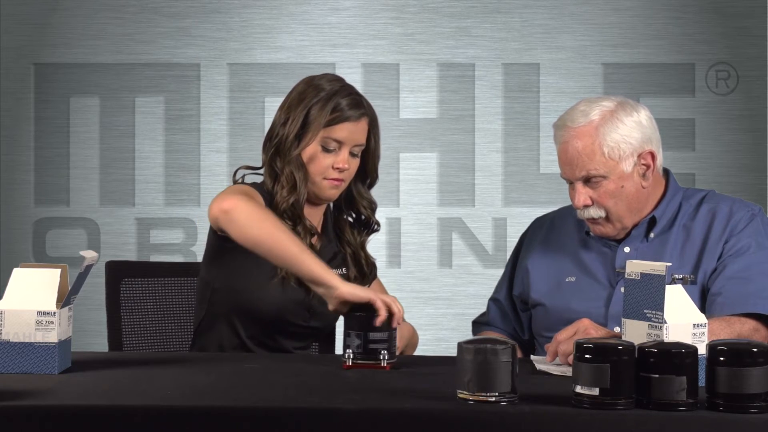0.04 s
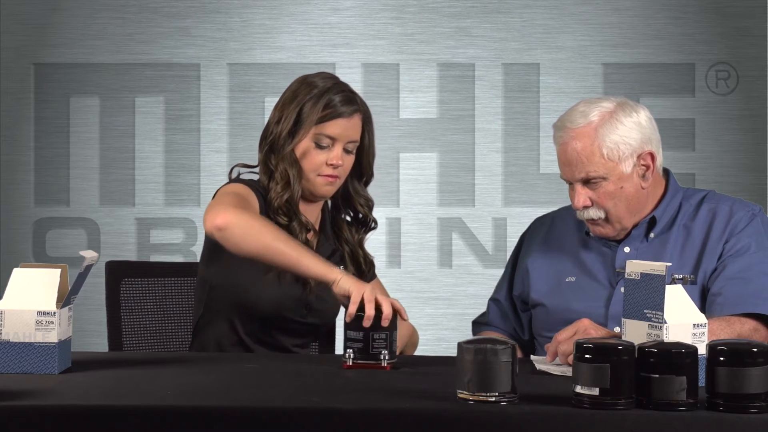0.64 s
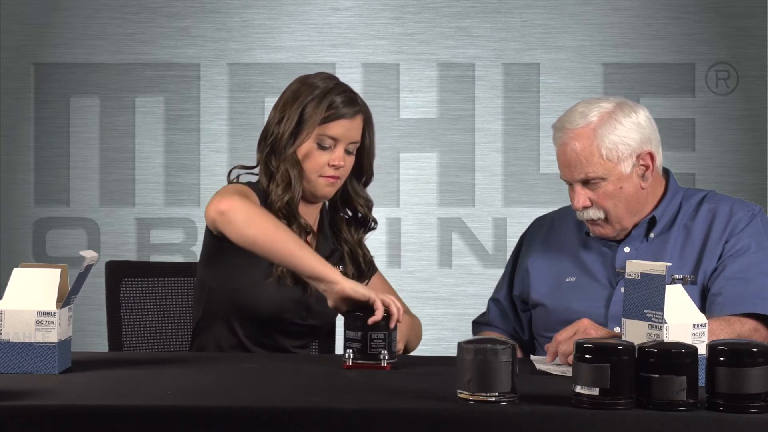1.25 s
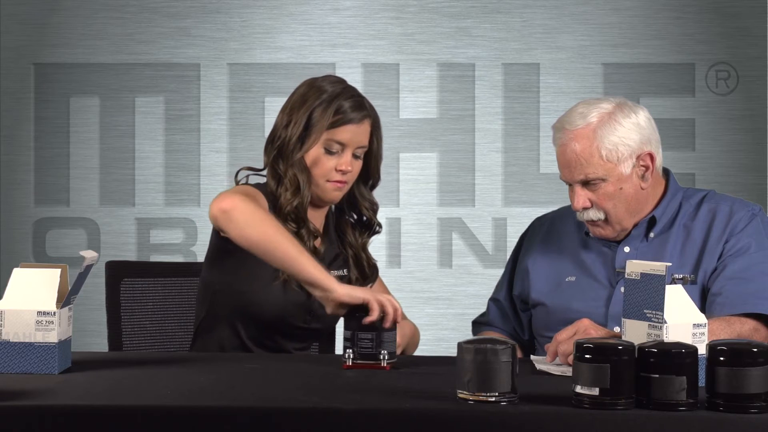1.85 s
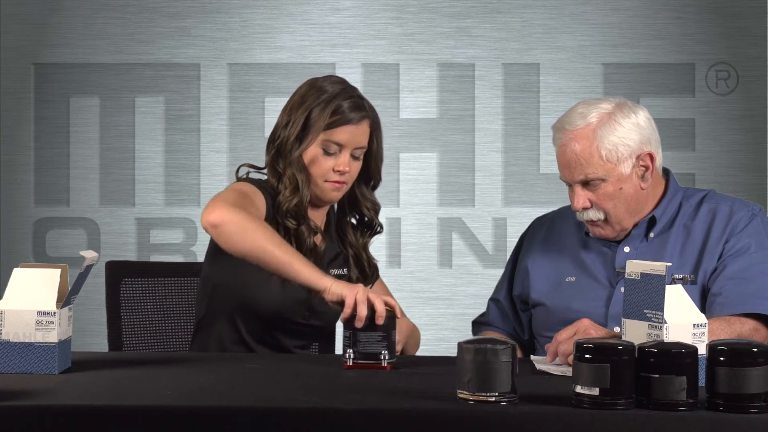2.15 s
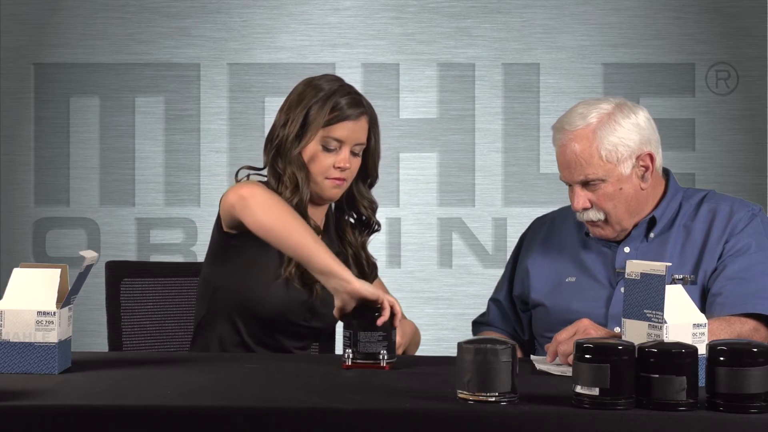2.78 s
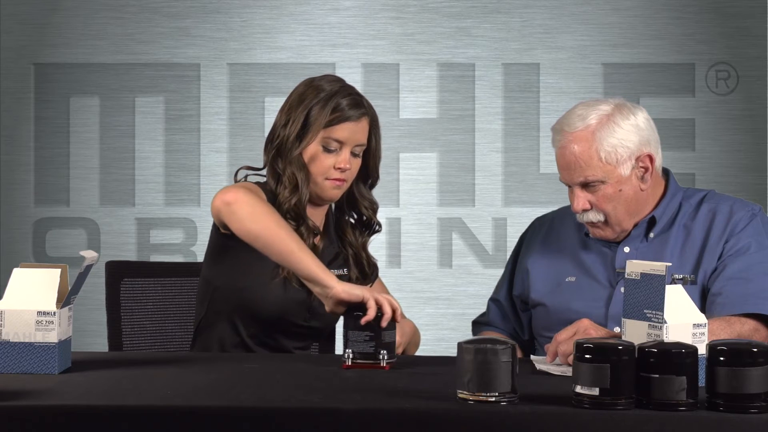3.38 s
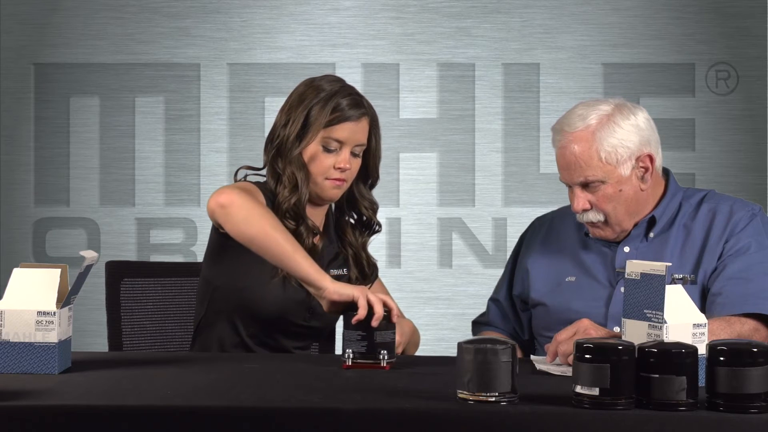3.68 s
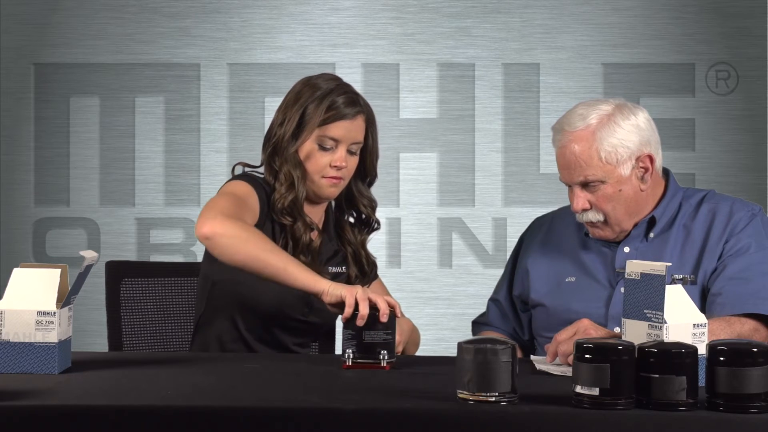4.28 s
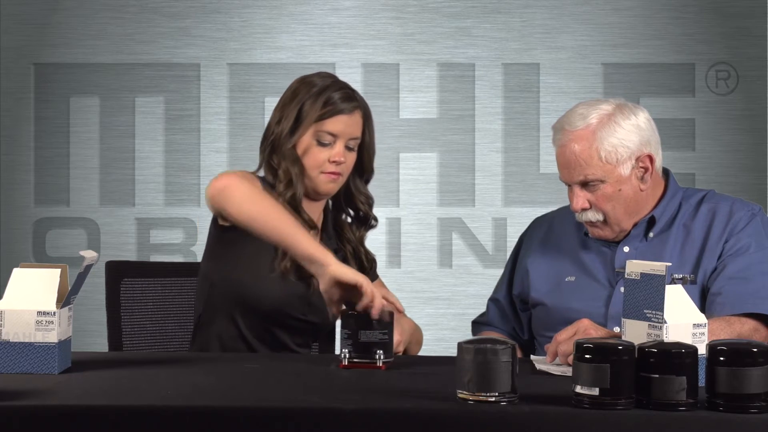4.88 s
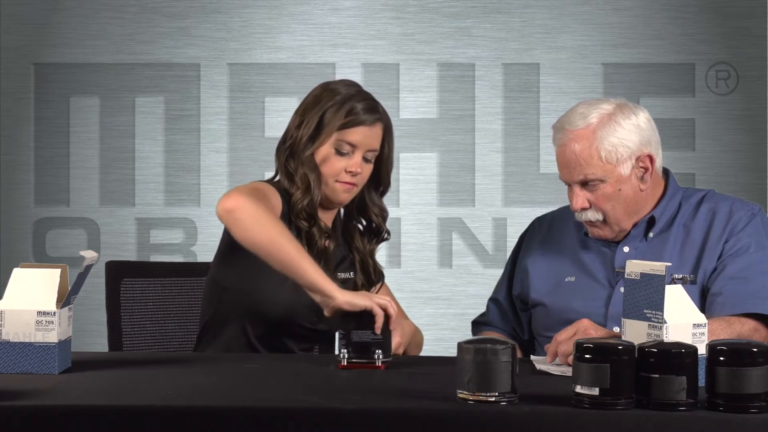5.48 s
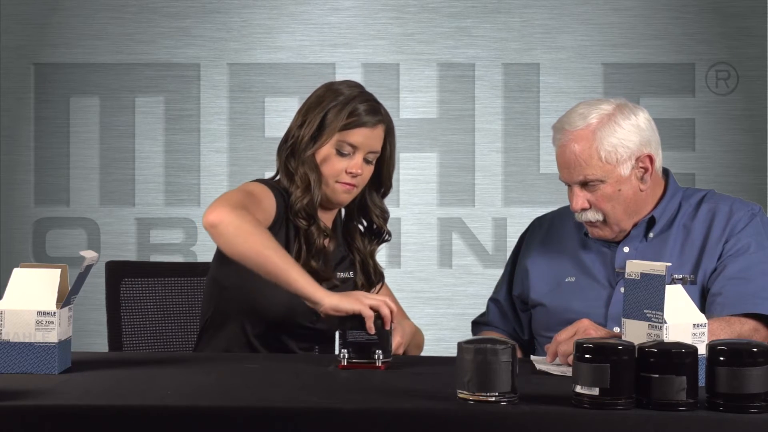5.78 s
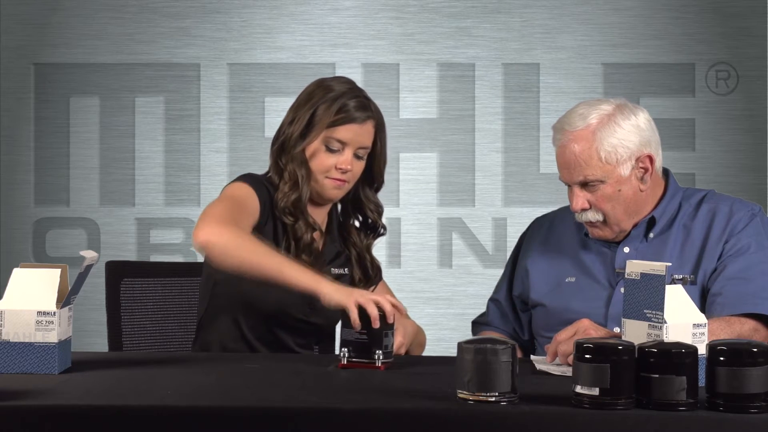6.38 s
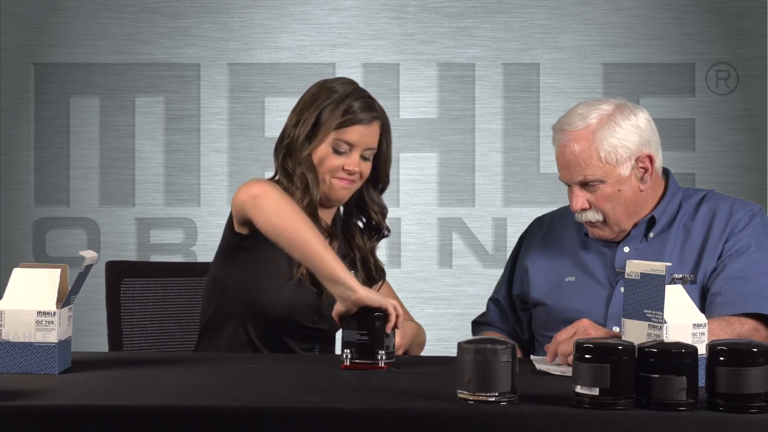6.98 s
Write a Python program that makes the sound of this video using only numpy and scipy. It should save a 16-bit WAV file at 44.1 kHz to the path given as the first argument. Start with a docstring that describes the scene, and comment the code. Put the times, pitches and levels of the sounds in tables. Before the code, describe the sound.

Scattered sharp clicks and a loud metal snap break the soft grinding of a cutting wheel circling a steel canister in a quiet room.

```python
"""A steel oil filter is turned by hand in a cutter on a cloth-covered table in a quiet studio.
Over a low rumble, the cutting wheel rolls in its groove with a grainy rub and at first slips with
sharp clicks. Near 2 s the can's wall gives way with one loud, ringing snap, and more slips follow.
Just after 4 s the wheel ticks over a burr, then come soft, gritty scrapes and faint, high whistles.
A last dull double clack comes near 7 s."""
import sys
import numpy as np
from scipy import signal
from scipy.fft import rfft, irfft
from scipy.io import wavfile

SR = 44100
rng = np.random.default_rng(int(sys.argv[2]) if len(sys.argv) > 2 else 0)


def unload_wav(signal):
    """Save mono or channel-first audio to the path in sys.argv[1] as 16-bit WAV at rate SR, clipped to [-1, 1]."""
    wavfile.write(
        sys.argv[1],
        SR,
        np.round(np.clip(np.atleast_2d(signal).T, -1, 1) * 32767).astype(np.int16),
    )


N = 319284
TIME = np.arange(N) / SR


def from_db(db):
    """Turn decibels into a number to multiply by."""
    return 10 ** (np.asarray(db) / 20)


def rms_one(x):
    """Scale a sound so that its average strength (rms) is one."""
    return x / np.sqrt(np.mean(x ** 2) + 1e-20)


def unit_energy(x):
    """Scale each channel so that its squared samples add up to one."""
    return x / np.sqrt(np.sum(x ** 2, axis=-1, keepdims=True) + 1e-20)


def at_hz(points, hz):
    """Read between a table's rows, giving every octave the same room."""
    f, value = np.transpose(points)
    return np.interp(np.log(np.maximum(hz, 1)), np.log(f), value)


def fade(t, t60):
    """Die away by 60 dB in t60 seconds, the "fade time" of the tables."""
    return np.exp(-np.log(1000) * t / t60)


def band(x, low_hz, high_hz, order=2):
    """Keep the part of a sound between two frequencies."""
    edges = [low_hz, min(high_hz, SR / 2 - 500)]
    return signal.sosfilt(signal.butter(order, edges, "band", fs=SR, output="sos"), x)


def add(track, s, sound):
    """Mix a sound into a track, starting at s seconds."""
    start = round(s * SR)
    track[start:start + len(sound)] += sound[:N - start]


def panned(x, left_db):
    """Make the left side louder than the right."""
    return x * from_db(np.array([[left_db], [-left_db]]) / 2)


def drift(per_s):
    """A line that wanders from one random value to the next."""
    points = rng.standard_normal(4000)
    return np.interp(TIME * per_s, np.arange(len(points)), points)


def grains(per_s, spread_db):
    """Tiny random contacts of uneven size, in two channels."""
    sizes = from_db(spread_db * np.minimum(rng.exponential(1, N), 4))
    return rms_one(rng.standard_normal((2, N)) * sizes * (rng.random(N) < per_s / SR))


def gestures(rows, attack_s, release_s):
    """The strength over time of movements that each rise, hold and fall."""
    out = np.zeros(N)
    for s, length_s, db in rows:
        rise = (TIME - s) / attack_s
        fall = (s + length_s - TIME) / release_s + .5
        out += from_db(db) * np.clip(np.minimum(rise, fall), 0, 1)
    return out


def strokes(rows, width, per_s, attack):
    """Short grainy hisses, each around one pitch; attack is the share of the length spent swelling."""
    out, grit = np.zeros(N), grains(per_s, spread_db=3.5)[0]
    for s, length_s, db, hz in rows:
        age = np.maximum(TIME - s, 0) / length_s
        swell = np.minimum(age / attack, 1) * np.exp(-age ** 2)
        out += from_db(db) * swell * rms_one(band(grit, hz / (1 + width), hz * (1 + width)))
    return out


def crack(t, low_hz, high_hz, hold_s, t60, rise_s=.0007):
    """A noise burst with no pitch, holding as much energy as one millisecond at level one."""
    burst = rng.standard_normal(len(t)) * np.minimum(t / rise_s, 1) * fade(np.maximum(t - hold_s, 0), t60)
    even = irfft(np.exp(1j * np.angle(rfft(burst))), len(t))  # all frequencies equally strong
    trimmed = even * fade(t, 10 * t60) * (t < t[-1] / 2)
    return unit_energy(band(trimmed, low_hz, high_hz, order=3)) * np.sqrt(SR / 1000)


def ring(t, tones, scatter_db, detune, rise_s=0.00063):
    """Struck steel rings in fading tones of uneven strength; detune is how far the grip shifts them."""
    hz, db, t60 = np.transpose(tones)[:, :, None]
    hz = hz * (1 + detune * rng.standard_normal(hz.shape))
    strength = from_db(db + scatter_db * rng.standard_normal(hz.shape))
    swings = np.sin(2 * np.pi * (hz * t + rng.random(hz.shape)))
    return np.sum(strength * swings * fade(t, t60), axis=0) * np.minimum(t / rise_s, 1)


# how alike the two ears' sounds are: (frequency [Hz], likeness [0 to 1])
EAR_LIKENESS = [(300, 0.93), (1400, 0.76), (15000, 0.75)]
def left_and_right(shared, differing, hz):
    """Blend two noises into left and right; low sounds are the most alike."""
    alike = at_hz(EAR_LIKENESS, hz)
    return np.sqrt((1 + alike) / 2) * shared + np.sqrt((1 - alike) / 2) * differing * [[1], [-1]]


def colour(x, spectrum):
    """Give noise a table's balance of low and high, falling steeply past both ends."""
    hz = np.fft.rfftfreq(N, 1 / SR)
    ends = 1 / np.sqrt((1 + (spectrum[0][0] / (hz + 1)) ** 8) * (1 + (hz / spectrum[-1][0]) ** 8))
    shared, differing = rfft(x) * from_db(at_hz(spectrum, hz)) * ends
    return rms_one(irfft(left_and_right(shared, differing, hz), N))


# the tone colour of the room's hiss: (frequency [Hz], relative level [dB])
HISS_COLOUR = [(88, -32.5), (150, -4.5), (321, -16), (730, -19), (2140, -33.5), (3160, -37.5),
               (13400, -41.5), (16000, -46.5)]
def hiss(level_db=-64):
    """The room hisses faintly and evenly."""
    return from_db(level_db) * colour(rng.standard_normal((2, N)), HISS_COLOUR)


# twists of the can by hand: (start [s], length [s], level [dB])
HAND_TWISTS = [(0.03, 0.42, -70.5), (0.40, 0.51, -63.5), (1.08, 0.26, -66), (1.50, 0.73, -65.5),
               (2.05, 0.33, -62), (2.68, 0.24, -64.5), (3.88, 0.27, -64.5), (4.13, 0.34, -60.5),
               (4.40, 0.27, -60.5), (4.66, 0.52, -61), (5.10, 0.62, -64.5), (5.66, 0.61, -65),
               (6.03, 0.41, -62.5), (6.38, 0.36, -67), (6.72, 0.46, -60.5)]
def effort(resting_db=-74):
    """How hard the wheel is driven; between twists it still rests on the steel."""
    return np.hypot(from_db(resting_db), gestures(HAND_TWISTS, attack_s=0.055, release_s=0.2))


# the tone colour of the rumble: (frequency [Hz], relative level [dB])
RUMBLE_COLOUR = [(12, 7.5), (33, 0), (115, -12.5), (161, -21), (300, -32), (390, -59)]
def rumble(room_db=-45.5, arm_boost_db=17):
    """The room rumbles steadily, and the working arms add to it with each twist."""
    swell = np.hypot(from_db(room_db), from_db(arm_boost_db) * effort())
    return swell * colour(rng.standard_normal((2, N)), RUMBLE_COLOUR)


# the arms lean on the table: (time [s], level [dB])
TABLE_HEAVES = [(1.83, -39), (2.14, -39), (2.85, -42.5), (5.26, -37.5), (5.73, -44), (6.899, -41)]
def heaves(swell_s=0.05):
    """The table heaves under the arms with short, very deep swells."""
    leaning = sum(from_db(db) * np.exp(-((TIME - s) / swell_s) ** 2) for s, db in TABLE_HEAVES)
    return leaning * rms_one(band(rng.standard_normal(N), low_hz=13, high_hz=64.1))


# thin whistles: (start [s], length [s], level [dB], pitch [Hz])
THIN_WHISTLES = [(1.6, 0.22, -80, 3700), (5.06, .22, -80, 8200), (6.15, 0.1, -77, 8150),
                 (6.31, 0.11, -73.5, 8150), (6.76, 0.18, -80, 8200)]
def whistles():
    """Faint, narrow, high whistling hisses come and go."""
    return strokes(THIN_WHISTLES, width=.028, per_s=3400, attack=.5)


# the cutter knocks on the padded table: (time [s], level [dB])
BASE_KNOCKS = [(0.445, -40), (0.542, -40), (2.095, -34.5), (2.41, -36), (3.69, -48.5), (5.427, -42),
               (7.091, -33.5), (7.109, -33.5)]
def knocks():
    """A jolt presses the base into the cloth with a dull thump."""
    out = np.zeros(N)
    for s, db in BASE_KNOCKS:
        add(out, s, from_db(db) * crack(TIME[:SR // 4], 130, 400, hold_s=0.0009, t60=0.095))
    return out


# fingertips land: (time [s], level [dB])
FINGER_TAPS = [(1.154, -48.5), (1.235, -50.5), (1.305, -59), (1.507, -49), (2.805, -51.5), (3.452, -55.5),
               (5.054, -45), (5.545, -50.5)]
def taps():
    """A fingertip meets the can with a small dull tap."""
    out = np.zeros(N)
    for s, db in FINGER_TAPS:
        add(out, s, from_db(db) * crack(TIME[:SR // 8], 280, 1570, hold_s=0.0012, t60=0.054))
    return out


# fingers brush the can: (start [s], length [s], level [dB], pitch [Hz])
FINGER_SCUFFS = [(0.09, 0.035, -63, 5300), (0.827, 0.017, -68.5, 5560), (1.51, 0.031, -70.5, 4760),
                 (2.398, 0.032, -54.5, 5260), (2.803, 0.011, -61.5, 5130), (4.48, 0.15, -62, 559),
                 (4.69, 0.068, -61, 1170), (5.373, 0.039, -69.5, 5000), (5.405, 0.048, -62, 1100),
                 (6.05, 0.14, -69.5, 5230), (6.465, 0.043, -66, 4910)]
def scuffs(shell_t60=0.017):
    """Rubbing fingers stir the many close, short-lived tones of the hollow can."""
    brushing = strokes(FINGER_SCUFFS, width=0.3, per_s=4100, attack=0.12)
    shell = unit_energy(rng.standard_normal(2000) * fade(TIME[:2000], shell_t60))
    return signal.oaconvolve(brushing, shell)[:N]


# short tones heard in the scrapes and the ticks: (pitch [Hz], level [dB], fade time [s])
RINGING_TONES = [(1435, -2.5, 0.023), (1860, -5, 0.013), (2298, -1, 0.032), (2660, -7, 0.012),
                 (4610, 1, 0.012), (5830, 0, 0.021), (6900, 1.5, 0.02)]
def rasp(grit, plain_db=-8):
    """A few ringing tones stand out of a plain, gritty hiss."""
    out = from_db(plain_db) * grit
    for hz, db, t60 in RINGING_TONES:
        half_width = np.log(1000) / (2 * np.pi * t60)  # a shorter ring covers more frequencies
        out += from_db(db) * band(grit, hz - half_width, hz + half_width, order=1)
    return out


# soft sliding sounds: (start [s], length [s], level [dB])
SOFT_SLIDES = [(0.415, 0.069, -55.5), (4.66, 0.97, -75), (5.78, 0.26, -68.5), (6.04, 0.22, -63),
               (6.17, 0.061, -72)]
# the tone colour of the scrape: (frequency [Hz], relative level [dB])
SCRAPE_COLOUR = [(600, 6), (1500, 5.5), (2500, 1.5), (4000, -5), (6500, -9.5), (15000, -17)]
def scrapes():
    """A soft, gritty sliding scrape with a few ringing tones."""
    grit = grains(per_s=2200, spread_db=2.8) * from_db(1.7 * drift(per_s=110))
    return gestures(SOFT_SLIDES, attack_s=0.013, release_s=0.079) * colour(rasp(grit), SCRAPE_COLOUR)


# the tone colour of the rolling wheel: (frequency [Hz], relative level [dB])
RUB_COLOUR = [(59, -26), (100, -0.5), (151, -7.5), (315, -12), (742, -17.5), (1080, -27), (1400, -30.5),
              (2150, -39), (6000, -50), (7800, -75.5)]
def rolling_rub():
    """The wheel grinds along its groove, low and grainy, louder with each twist."""
    grinding = grains(per_s=2400, spread_db=2.1) * from_db(2.6 * drift(per_s=40))
    return from_db(6.0) * effort() * colour(grinding, RUB_COLOUR)


# the wheel meets the burr, a rough lip in its groove: (time [s], level [dB], treble [dB])
BURR_TICKS = [(4.127, -47, -8), (4.2393, -44.5, 2.5), (4.3103, -40.5, 3), (4.385, -50, -2),
              (4.486, -54.5, -6)]
def ticks():
    """The wheel crunches over the burr: a dull body, a light ring and a fine bright edge."""
    out, t = np.zeros(N), TIME[:SR // 8]
    for s, db, treble_db in BURR_TICKS:
        tones = [(hz, level + treble_db * (hz > 3000), t60) for hz, level, t60 in RINGING_TONES]
        edge = crack(t, 3400, 15500, hold_s=.0015, t60=.018, rise_s=.0003)
        body = crack(t, 450, 2000, hold_s=.002, t60=.03)
        wheel = ring(t, tones, scatter_db=3.5, detune=.04)
        add(out, s, from_db(db) * (wheel + body + from_db(treble_db + 3.0) * edge))
    return out


# bunches of close tones in the cutter's frame: (pitch [Hz], width [Hz], level [dB], fade time [s])
FRAME_SHIMMER = [(2290, 190, -48.5, .6), (3380, 400, -47, 0.93)]
def shimmer(t):
    """Close tones beat against each other and linger as a rough, blurred ring."""
    out = np.zeros(len(t))
    for hz, width, db, t60 in FRAME_SHIMMER:
        bunch = rms_one(band(rng.standard_normal(len(t)), hz - width / 2, hz + width / 2))
        out += from_db(db) * bunch * fade(t, t60)
    return out


# the tones of the cutter's frame and axle: (pitch [Hz], level [dB], fade time [s])
FRAME_TONES = [(1570, -8, 0.0096), (3130, -5.5, 0.0091), (4487, -6.5, 0.021), (5100, -3.5, 0.016),
               (5815, -5, 0.017), (6740, -4.5, 0.014), (7980, -15, 0.012), (9020, -19, 0.0251),
               (10130, -17.5, 0.0073), (12080, -9.5, 0.017)]
def frame_ring(t, bright_db, sizzle_db):
    """The jolted frame rings and shimmers; sizzle sets its highest tones, brightness the rest."""
    tones = [(hz, db + (sizzle_db if hz > 7500 else bright_db), t60) for hz, db, t60 in FRAME_TONES]
    return ring(t, tones, scatter_db=2, detune=.012) + from_db(bright_db) * shimmer(t)


# clicks of the slipping wheel and, in the last two rows, a dull double clack:
# (time [s], level [dB], body [dB], brightness [dB], sizzle [dB], can pitch [Hz], can level [dB])
CLICKS_AND_CLACKS = [(0.036, -47.5, -28, -2, -2, 1070, -17), (0.055, -38.5, -6, -3.5, -4.5, 2540, -20),
                     (0.127, -34, -6, -3.5, -9, 2340, -18), (0.2846, -23, -22, -7.5, -8, 2320, -16.5),
                     (0.323, -23, -22, -6, -4, 2270, -26), (0.4312, -37, -23, -8, -11, 1850, -9),
                     (0.436, -22.5, -12, -15.5, -17, 1740, -6.5),
                     (0.444, -24.5, -10.5, -7, -6.5, 1930, -15), (0.4767, -38.5, -6, -0.5, -2, 2520, -12),
                     (0.499, -43, -10, -3.5, -10, 2530, -13), (0.549, -51.5, -5, -6, -11, 2530, -20),
                     (2.397, -37.5, 5, -13, -20, 1440, -18), (2.411, -21, -11, -26, -22.5, 2338, -11.5),
                     (3.323, -11, -24.5, -7, -8, 2240, -15.5), (3.684, -19.5, -24, -9.5, -4, 2364, -15),
                     (3.695, -18.5, -23, -2, 1.5, 2367, -11.5), (5.4, -42.5, 10, -13, -39, 917, -3.5),
                     (6.212, -35.5, -1, -15, -33, 1420, -26), (6.471, -47, 8.5, -13, -31, 1310, -27),
                     (7.088, -19.5, -4, -22.5, -22, 2234, -9.5), (7.109, -24.5, 2, -20, -42, 957, -10)]
def clicks_and_clacks(hold_s=0.0015, can_rise_s=0.0016):
    """Each jolt cracks, rings the frame and sounds the can at a pitch set by the grip."""
    cracks, rings, t = np.zeros(N), np.zeros(N), TIME[:SR // 2]
    can_shape = fade(t, t60=0.023) * np.minimum(t / can_rise_s, 1)
    for s, db, body_db, bright_db, sizzle_db, can_hz, can_db in CLICKS_AND_CLACKS:
        body = from_db(body_db - 10) * crack(t, 570, 1950, hold_s, t60=0.033)
        middle = from_db(-14.5) * crack(t, 1690, 3300, hold_s, t60=0.022)
        bright = from_db(bright_db - 4.5) * crack(t, 3900, 7200, hold_s, t60=0.023)
        sizzle = from_db(sizzle_db - 8.5) * crack(t, 6200, 15000, hold_s, t60=0.023)
        add(cracks, s, from_db(db) * (body + middle + bright + sizzle))
        can = from_db(can_db + 7.5) * np.sin(2 * np.pi * can_hz * t) * can_shape
        add(rings, s, from_db(db) * (can + frame_ring(t, bright_db, sizzle_db)))
    return cracks, rings


# the tones of the can's wall: (pitch [Hz], level [dB], fade time [s])
WALL_TONES = [(544, -33.5, 0.065), (621, -28, 0.058), (780, -25, 0.034), (1285, -13.5, 0.029),
              (1630, -23.5, 0.02), (2078, -6.5, 0.028), (2765, -24, 0.028), (3040, -14, 0.027),
              (4250, -12, 0.033), (4950, -17, 0.025), (5900, -12, 0.02), (5930, -9, 0.015),
              (6433, -23.5, 0.062), (7680, -17, .02), (11640, -19, 0.022), (14700, -24.5, .045)]
def snap(at_s=2.0939, db=-6.5):
    """The wall cracks under the wheel, the whole can rings and its far side throws sound outward."""
    cracks, rings, thrown, t = np.zeros(N), np.zeros(N), np.zeros(N), TIME[:SR // 2]
    tear = from_db(-5) * crack(t, 4200, 6800, hold_s=.002, t60=.011, rise_s=.0002)
    fizz = from_db(-10) * crack(t, 7000, 15500, hold_s=.002, t60=.016, rise_s=.0002)
    buckle = from_db(-12.5) * crack(t, 1400, 3200, hold_s=.002, t60=.018)
    far_side = from_db(-12) * crack(t, 3200, 4400, hold_s=.002, t60=.018)
    add(cracks, at_s, from_db(db) * (tear + fizz + buckle))
    add(rings, at_s, from_db(db + 3.5) * ring(t, WALL_TONES, scatter_db=0.5, detune=0))
    add(thrown, at_s, from_db(db) * far_side)
    return cracks, rings, thrown


def spread(x, db=-13):
    """Sound from all round the curved can takes slightly different paths left and right."""
    paths = unit_energy(rng.standard_normal(400) * fade(TIME[:400], t60=0.002))
    return from_db(db) * signal.oaconvolve(x, paths)[:N] * [[1], [-1]]


def table_echo(x, left_s, right_s, db):
    """The table top sends the sound back a little later, by a different path to each side."""
    return from_db(db) * np.array([np.interp(TIME - lag, TIME, x) for lag in (left_s, right_s)])


# the studio's echo: (frequency [Hz], fade time [s], level [dB])
STUDIO_ECHO = [(300, .8, 6), (700, 0.85, 8.5), (1300, 0.67, 0), (2192, 0.5, 1.5), (3600, .9, 1),
               (5900, .66, -5.5), (7600, 0.28, -2), (15000, 0.25, -3.5)]
def studio(x, early_db, early_t60, late_db):
    """Quick echoes off the table and the things on it, then a weak tail whose top fades first."""
    t, response, walls = TIME[:SR], 0, np.array(STUDIO_ECHO)
    fade_times, levels = walls[:, :2], walls[:, ::2]
    arrived = np.clip((t - .004) / 0.0037, 0, 1)
    early = from_db(early_db) * unit_energy(arrived * fade(t, early_t60))
    edges = np.geomspace(150, 18000, 21)
    for low, high in zip(edges, edges[1:]):
        hz = np.sqrt(low * high)
        shared, differing = band(rng.standard_normal((2, SR)), low, high, order=4)
        noise = left_and_right(shared, differing, hz)
        late = from_db(late_db) * unit_energy(arrived * fade(t, at_hz(fade_times, hz)))
        response = response + from_db(at_hz(levels, hz)) * noise * np.hypot(early, late)
    return signal.fftconvolve(x[None], response, axes=1)[:, :N]


def scene():
    """The cutter sits a little left; high ringing stays close, cracks and low tones fill the room."""
    jolt_cracks, jolt_rings = clicks_and_clacks()
    snap_crack, snap_ring, snap_thrown = snap()
    clicks = jolt_cracks + snap_crack + ticks()
    close = clicks + jolt_rings + snap_ring
    low_ring = band(snap_ring, 400, 1900)
    ringing = from_db(-7.5) * jolt_rings + from_db(-7) * snap_ring + from_db(-5) * low_ring
    room = studio(clicks + snap_thrown + ringing, early_db=-13.5, early_t60=0.12, late_db=-19.0)
    side_paths = spread(close) + table_echo(close, left_s=.00146, right_s=0.0015, db=-12.5)
    soft_sounds = rolling_rub() + scrapes() + scuffs() + whistles() + taps() + knocks()
    background = rumble() + heaves() + hiss()
    return panned(background + soft_sounds, left_db=3.0) + panned(close + room, left_db=2.0) + side_paths


def record(dry, fade_in_s=.008, cutoff_hz=16200):
    """Fade in quickly, clip any peak past full level and cut the very highest treble."""
    clipped = np.clip(dry * np.minimum(TIME / fade_in_s, 1), -1, 1)
    return signal.sosfilt(signal.ellip(10, .1, 80, cutoff_hz, fs=SR, output="sos"), clipped)


dry = scene()
out = record(dry)
unload_wav(out)
```